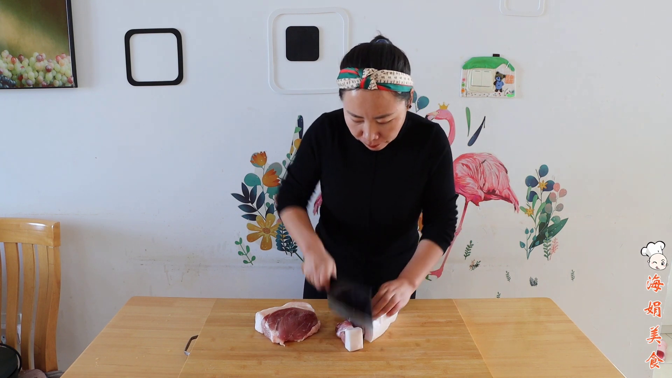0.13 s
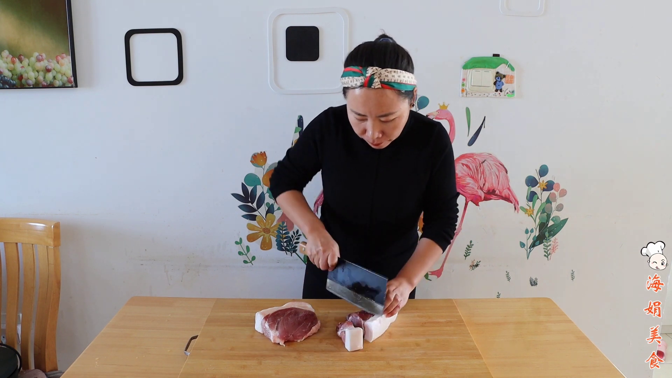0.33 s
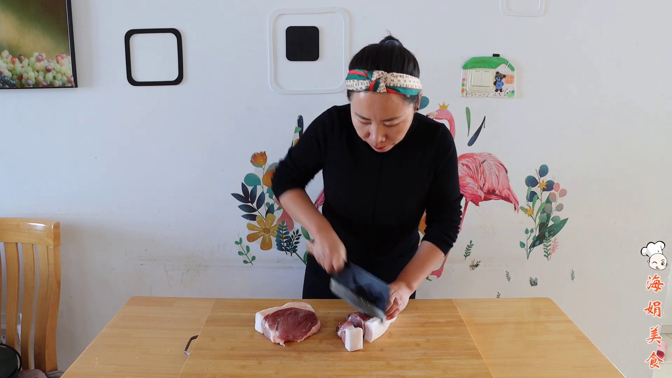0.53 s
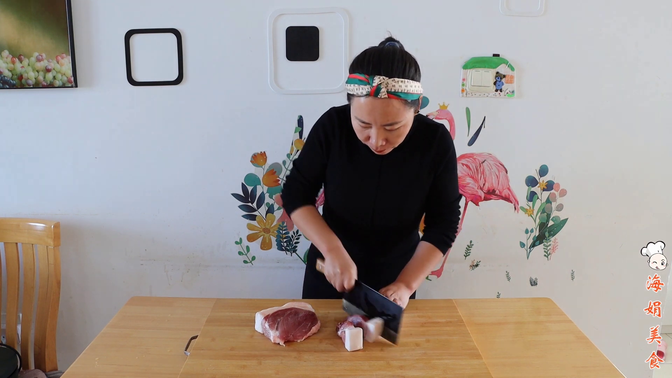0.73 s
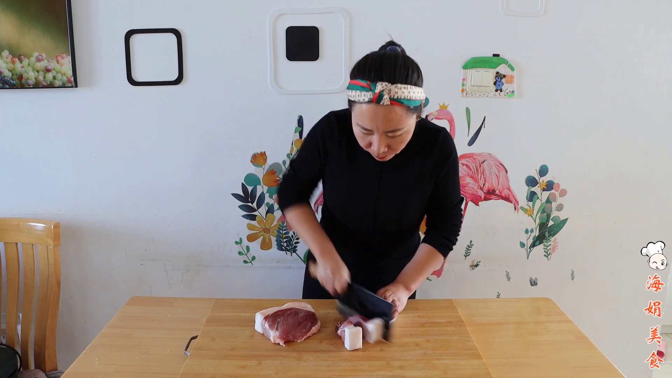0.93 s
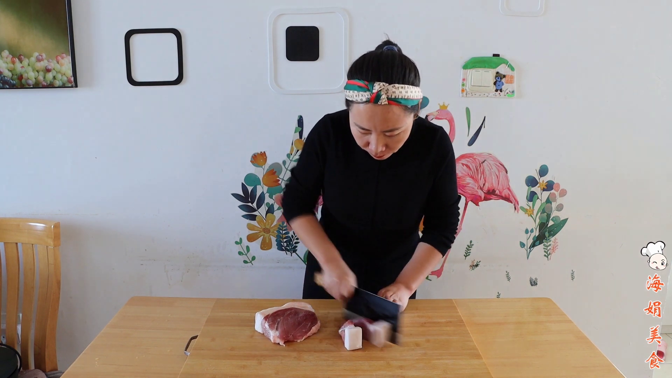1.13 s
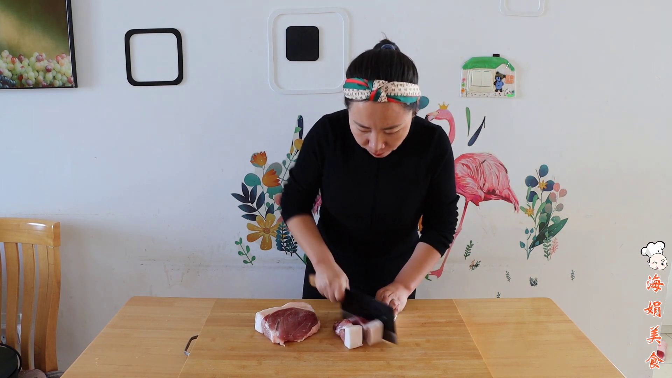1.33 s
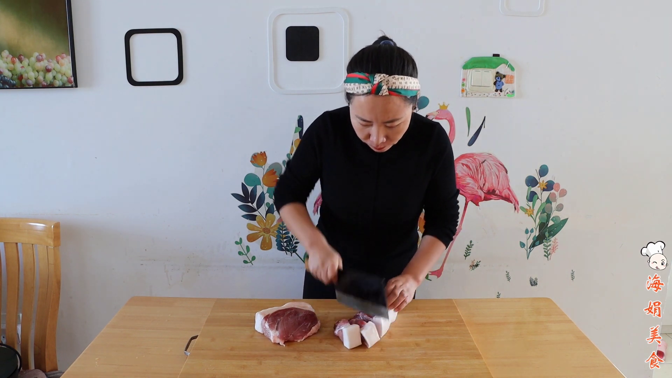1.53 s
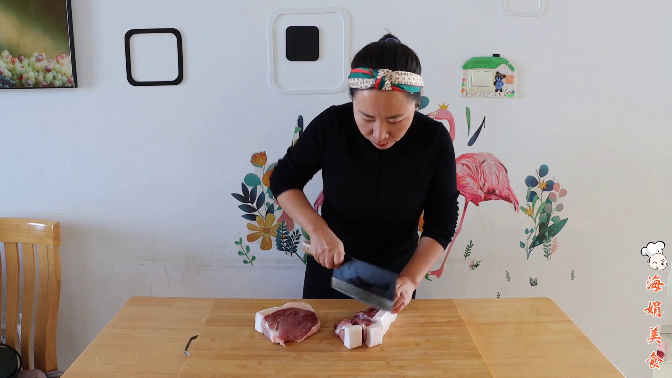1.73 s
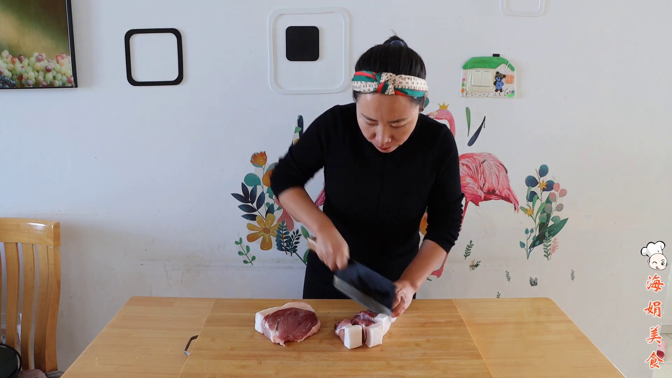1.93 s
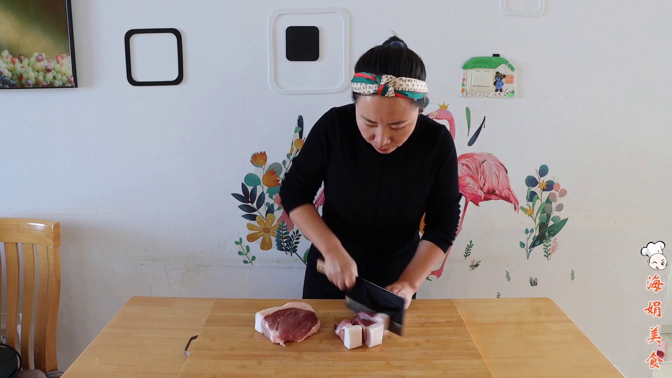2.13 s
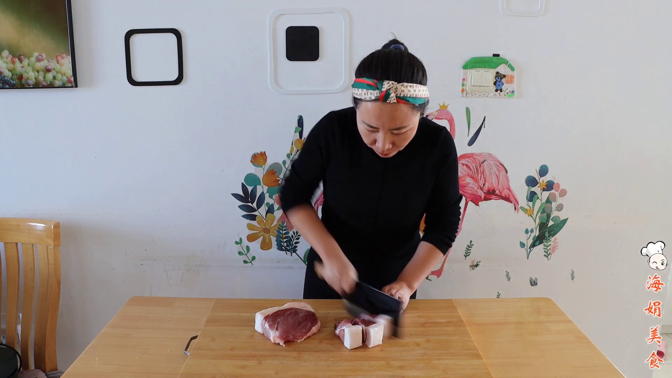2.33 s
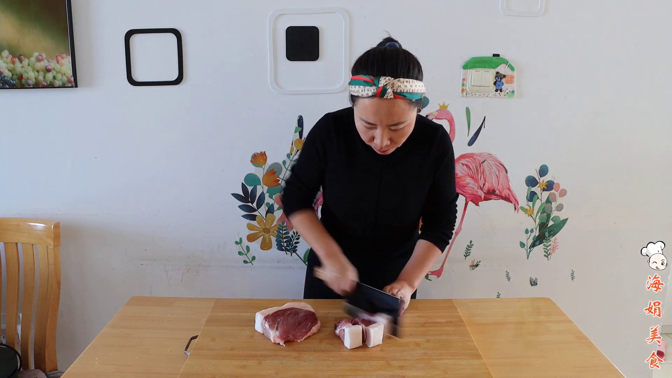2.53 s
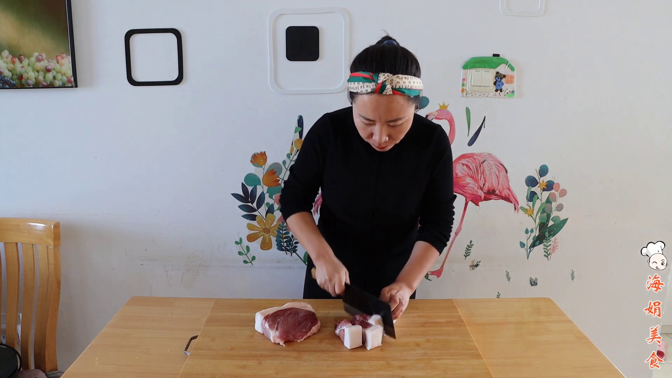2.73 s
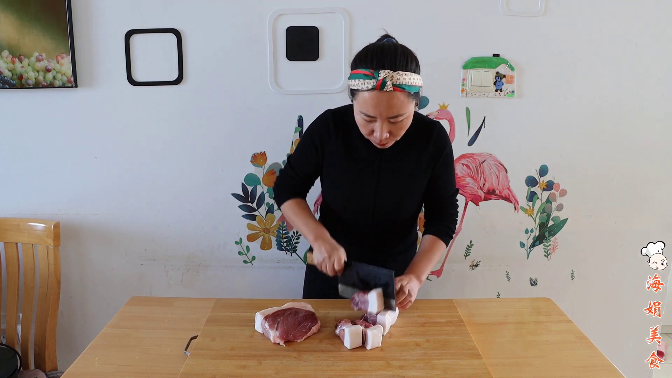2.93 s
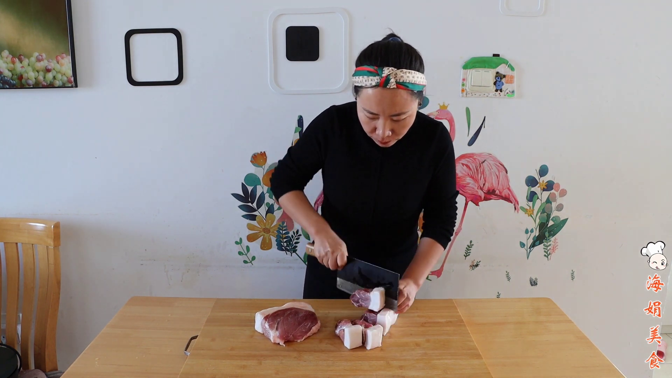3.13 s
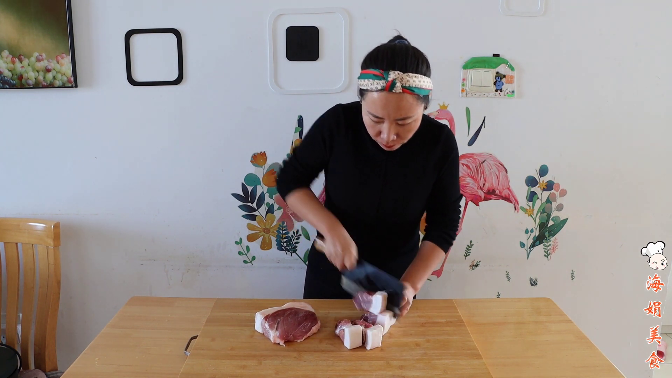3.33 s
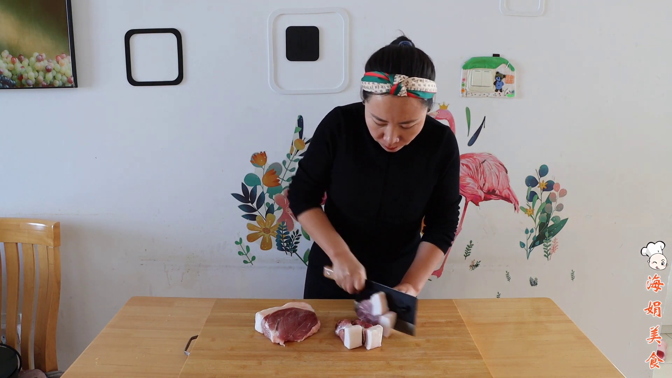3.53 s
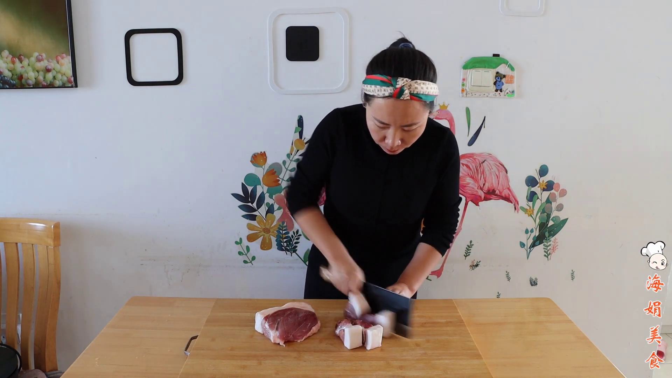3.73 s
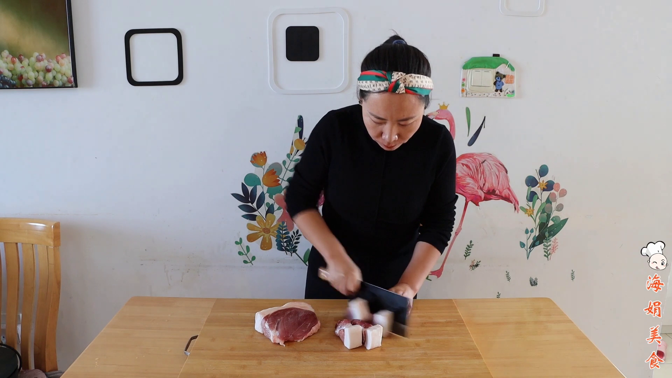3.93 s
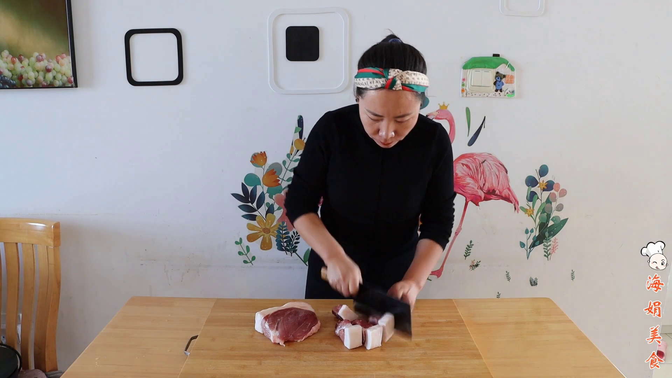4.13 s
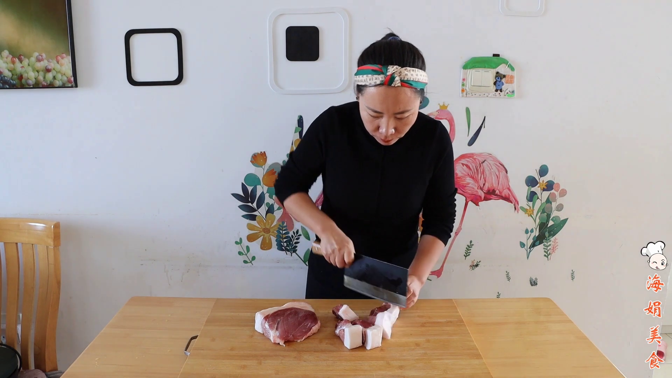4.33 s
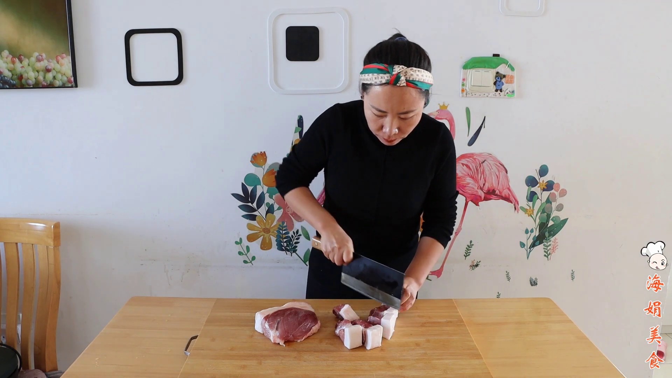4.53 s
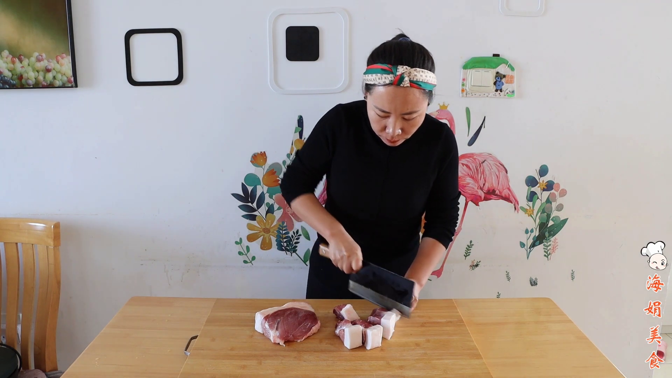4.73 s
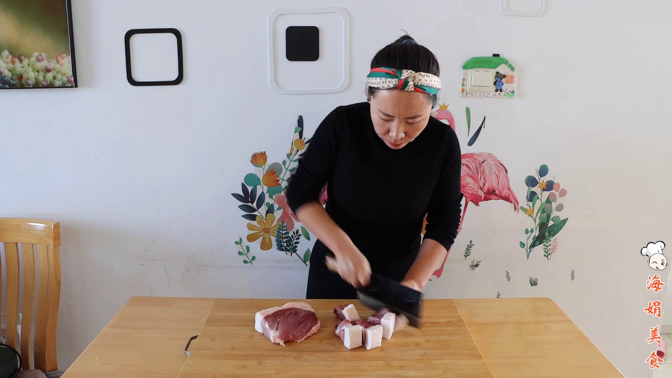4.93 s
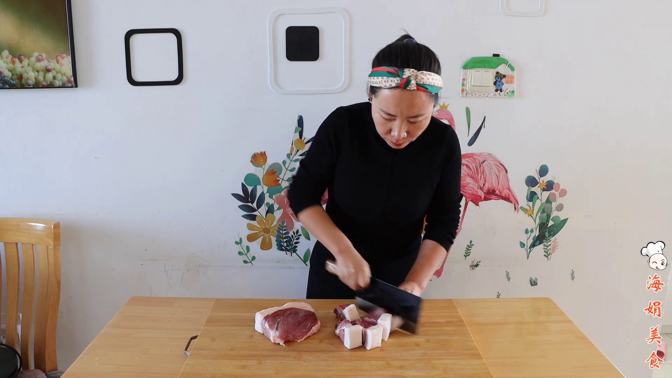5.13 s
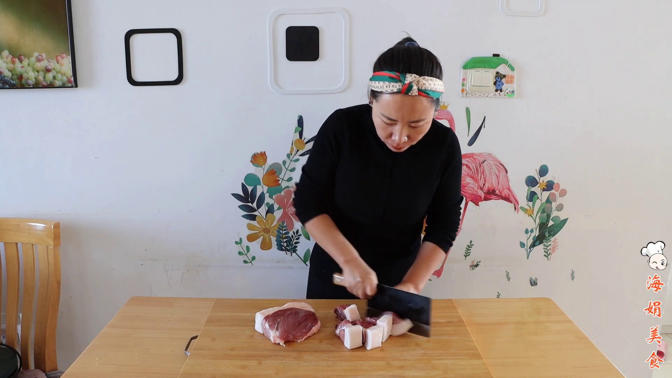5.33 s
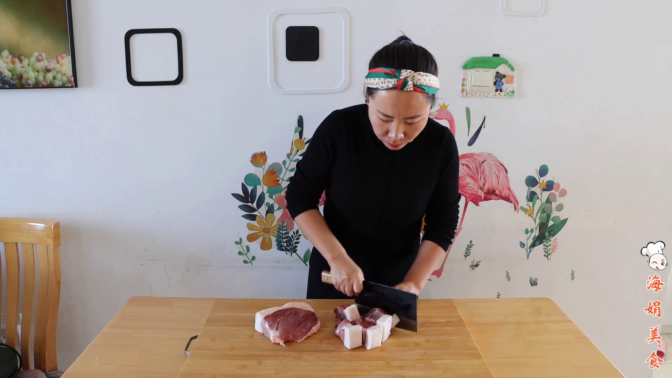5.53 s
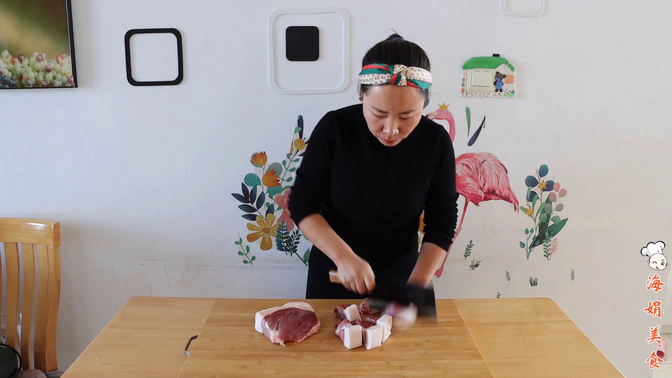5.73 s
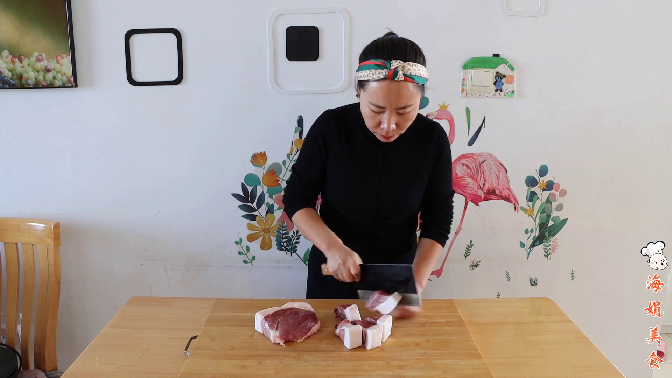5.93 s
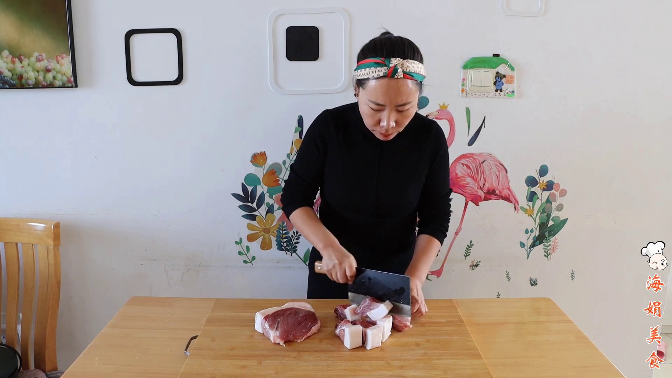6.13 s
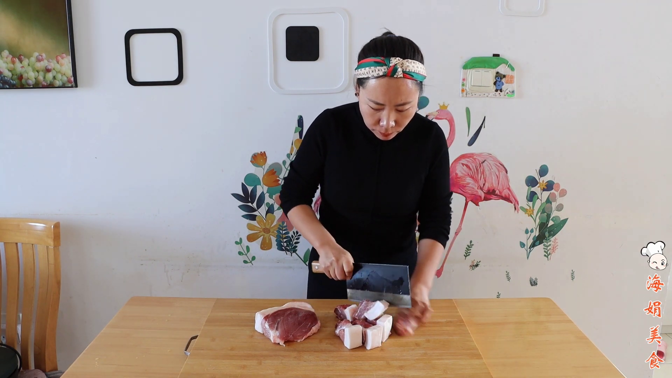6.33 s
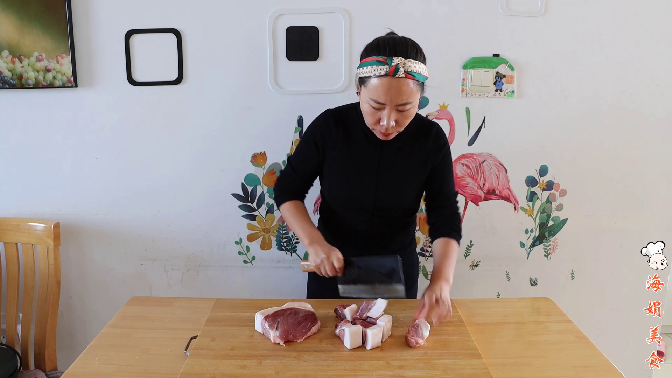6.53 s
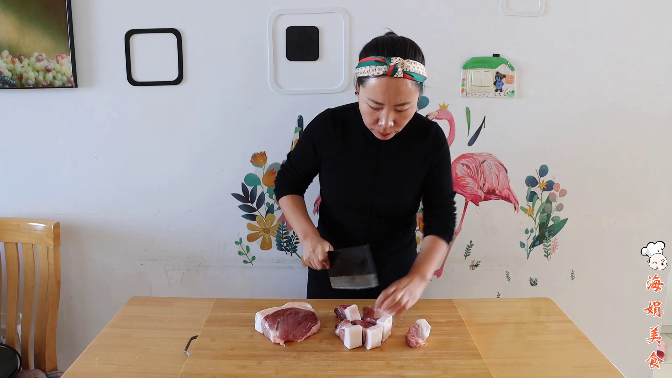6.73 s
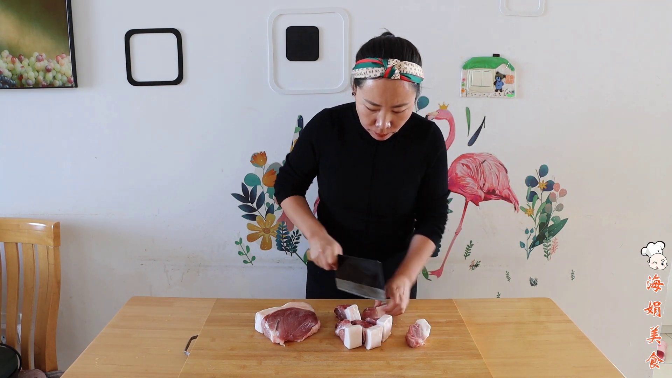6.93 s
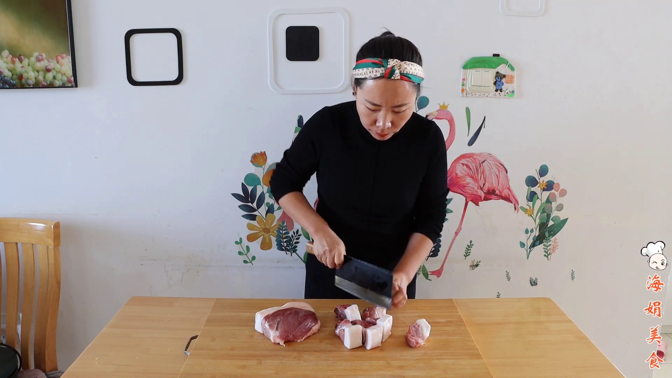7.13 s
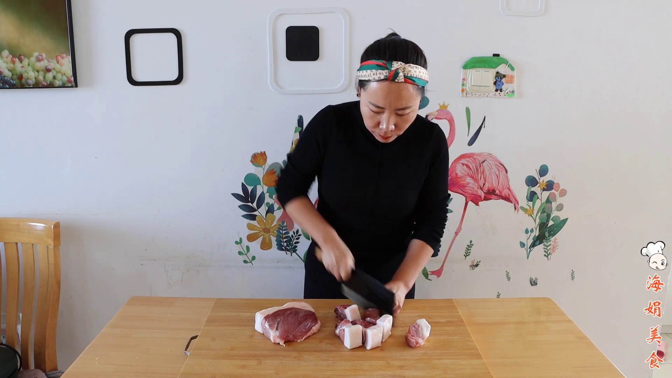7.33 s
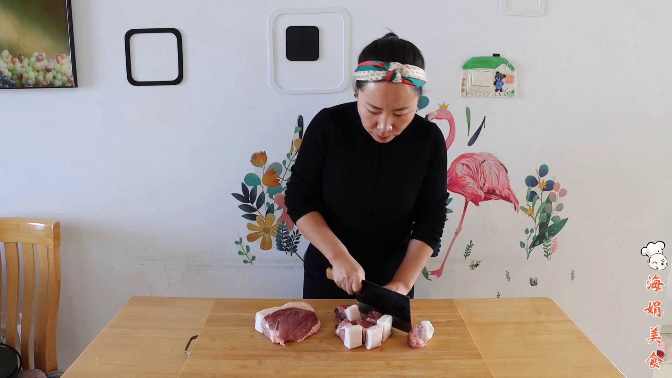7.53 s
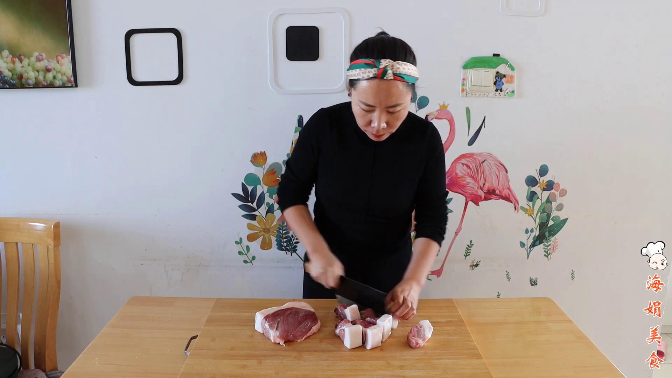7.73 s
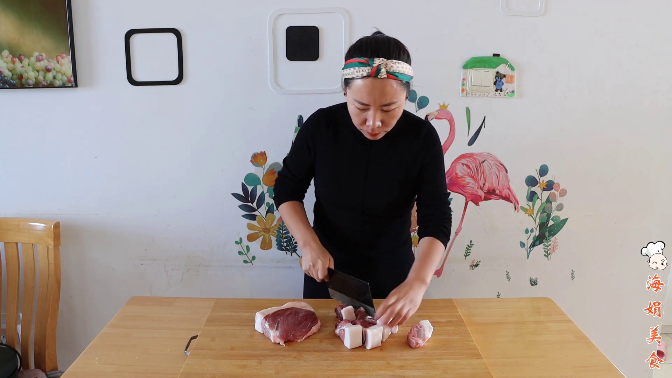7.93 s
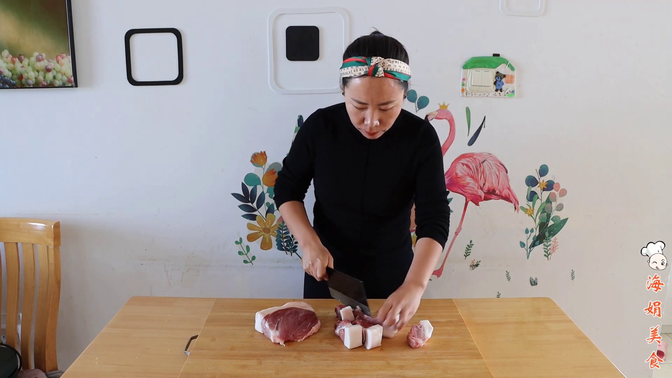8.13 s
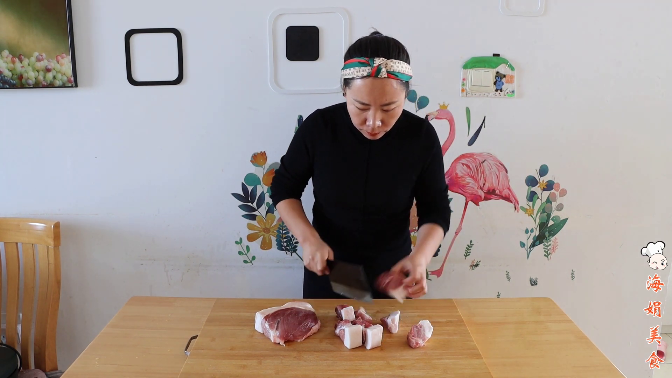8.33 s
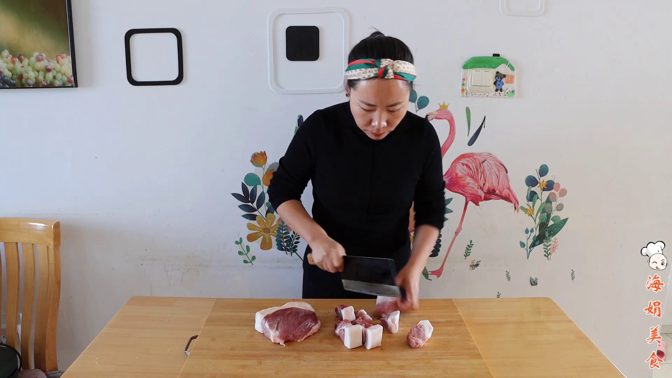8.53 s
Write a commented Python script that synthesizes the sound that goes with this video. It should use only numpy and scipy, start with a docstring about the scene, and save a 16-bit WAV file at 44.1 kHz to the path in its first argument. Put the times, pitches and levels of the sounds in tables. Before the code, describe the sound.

In a bare, echoing kitchen, a heavy cleaver saws through raw pork on a wooden table. Short strokes come in uneven bursts, rasping and hissing over a low rumble, with wet clicks, brief squeaks, light steel taps and soft bumps. Three knocks land as the blade breaks through; then fingers softly slide the meat, a last knock and few strokes follow, and a faint rub ends it. One microphone hears it over quiet room hiss.

```python
"""A cleaver saws through raw pork on a wooden table top in a bare, echoing kitchen.
From the start, strokes press (low rumble), rasp on wood and hiss: noise that follows the blade's speed.
Among them come wet clicks, squeaks, soft bumps, light taps of the blade, and four knocks as it breaks through.
Between the last two knocks fingers slide the meat about; after the last strokes comes a faint hollow rub.
Knocks, taps and clicks are short pulses given a room echo; a quiet room hiss lies under it all."""
import sys
import numpy as np
from scipy import signal
from scipy.fft import rfft, irfft, next_fast_len
from scipy.io import wavfile
from scipy.ndimage import map_coordinates

SR = 44100
rng = np.random.default_rng(int(sys.argv[2]) if len(sys.argv) > 2 else 0)


def to_wav(s):
    """Save 16-bit WAV."""
    ch = np.atleast_2d(s).T  # columns
    pcm = np.round(np.clip(ch, -1, 1) * 32767)  # PCM
    wavfile.write(sys.argv[1], SR, pcm.astype(np.int16))


N = 378593  # length in samples

# One row per push or pull of the blade; each layer's level is trimmed further when mixed:
# [start_s, length_s, press_db, rasp_db, bite_db (extra treble of the rasp), hiss_db]
STROKES = [(-0.075, .17, -44.5, -36.5, -3, -51.5), (0.042, 0.14, -48, -42.5, 4, -46),
           (0.629, 0.19, -47, -53, -2, -55), (0.76, .1, -46, -48.5, -1, -53.5),
           (1.054, 0.16, -45.5, -36, 0, -46), (1.244, .158, -45.5, -35.5, 1, -45),
           (1.392, 0.15, -50, -37.5, -1, -48.5), (2.059, 0.17, -42.5, -51.5, -5, -55),
           (2.134, 0.14, -43, -44.5, -2, -55), (2.445, 0.12, -40, -38.5, 0, -47),
           (2.627, .13, -43.5, -37, 1, -47.5), (2.806, 0.042, -44, -42.5, 1.5, -48),
           (3.394, 0.04, -50, -44, 1, -64), (3.43, .16, -43.5, -51, 1, -52.5),
           (3.531, 0.11, -41, -44.5, 1, -49), (3.675, .09, -64, -52, 1, -58),
           (3.812, 0.16, -41, -43.5, 0, -48.5), (4.027, 0.099, -44, -39.5, 5, -45),
           (4.153, 0.13, -46, -38.5, -3.5, -51), (4.298, .04, -65, -61, 0, -54),
           (4.735, 0.11, -53.5, -62.5, 9.5, -53), (4.992, 0.13, -44.5, -53, 7, -54.5),
           (5.076, 0.096, -42.5, -38.5, -0.5, -47.5), (5.368, .13, -40.5, -39, 1.5, -44.5),
           (5.578, 0.12, -44, -44.5, 5.5, -46.5), (5.708, 0.13, -46.5, -43.5, 1, -46),
           (7.447, 0.11, -45, -52.5, 2, -51), (7.722, 0.13, -48, -39.5, 0, -45),
           (7.84, 0.037, -43.5, -45.5, 4, -47.5)]
# Ring of the table and the room around it: [pitch_hz, level_db, t60_s (time to fade by 60 dB)]
TABLE_RING = [(63.5, -0.5, 0.98), (123.4, 8.5, 0.77), (144.8, 0.5, 0.97), (208.7, -1, 0.99),
              (246.3, 4.5, 0.66), (305.6, -8.5, 0.77), (340, -1.5, 0.2), (386.3, 1, 0.48), (500, 1.5, 0.72),
              (564.8, 4, 0.48), (799, 0.5, 0.74), (1060, -15, 0.31)]
# Ring of the steel blade: [pitch_hz, level_db, t60_s]
STEEL_RING = [(2250, -1, 0.16), (2670, -13, 0.17), (2960, 1, 0.37), (4770, 3, .2), (5615, 1.5, 0.33)]
# Resonances under the scraping edge: [pitch_hz, width_hz, level_db]
EDGE_RESONANCES = [(382, 69, -1.5), (556, 45, -1), (1196, 19, -6), (1750, 26, -21), (2510, 60, -12),
                   (2630, 86, -21), (3880, 86, -67)]
# Tone colours of the pressing rumble, the rasp on wood, the hiss of the edge and a parting fibre:
# [frequency_hz, relative_level_db (per Hz)]
RUMBLE_COLOUR = [(35, -35), (62, 0), (90, -12), (125, 0.5), (190, -3.5), (260, 1), (400, -8), (600, -10.5),
                 (1200, -39)]
RASP_COLOUR = [(200, -26), (380, -3.5), (600, -3), (900, -1), (1300, -5.5), (1700, -8), (3000, -12),
               (4500, -16.5), (7000, -35)]
HISS_COLOUR = [(2000, -8), (3800, -3), (5300, 1.5), (6400, -3), (8500, 1), (12000, -5), (15500, -14.5)]
SNAP_COLOUR = [(2000, -17), (4000, 1.5), (9000, -6), (12000, -5), (15500, -17)]
# How each layer follows a stroke: (power of the blade's speed, echo_db, echo_t60_s)
PRESS_LAW, RASP_LAW, HISS_LAW = (0.74, 3.1, 0.68), (0.99, 3.06, 0.5), (0.88, -6, 0.54)
BITE_HZ = 1400  # a biting edge lifts the rasp above this
# A fast edge sizzles: the top of the hiss is lifted above this level and dulled below it
SIZZLE_HZ, SIZZLE_AT_DB = 10500, -49


def slicing():
    """Pressing shakes the table; the sliding edge rasps on wood, hisses in meat and makes the steel ring."""
    starts, lengths, press_db, rasp_db, bite_db, hiss_db = np.transpose(STROKES)
    press = stroke_gain(starts, lengths, press_db, PRESS_LAW)
    rasp = stroke_gain(starts, lengths, rasp_db, RASP_LAW)
    bite = stroke_gain(starts, lengths, rasp_db + bite_db, RASP_LAW)
    hiss = stroke_gain(starts, lengths, hiss_db, HISS_LAW)

    shaken_table = filtered(grains(N, spread_db=3.5), lambda hz: 1 + amp(7.0) * ring(TABLE_RING, hz))
    rumble = coloured(shaken_table, RUMBLE_COLOUR)

    def body(hz):
        """The direct scrape plus what it sets ringing in blade and table."""
        return 1 + amp(2.5) * resonances(EDGE_RESONANCES, hz) + amp(6.5) * ring(TABLE_RING, hz)

    judder = wobble(70)  # stick and slip, shared by rasp and hiss
    scrape = coloured(filtered(grains(N, spread_db=1.5), body), RASP_COLOUR)
    scrape = roaming(scrape, depth_db=2.5) * amp(0.69 * judder)
    edge = coloured(grains(N, spread_db=1.5), HISS_COLOUR)
    edge = roaming(edge, depth_db=3.5) * amp(0.92 * judder)

    dull = filtered(scrape, lambda hz: 1 / (1 + (hz / BITE_HZ) ** 4))
    bright = scrape - dull
    rasping = amp(-0.83) * (rasp * dull + bite * bright)

    top = filtered(edge, lambda hz: 1 - 1 / (1 + (hz / SIZZLE_HZ) ** 6))
    sizzle = np.sqrt(hiss / amp(SIZZLE_AT_DB))
    hissing = amp(-1.1) * hiss * (edge + (sizzle - 1) * top)

    friction = rasping + hissing
    steel = filtered(friction, lambda hz: amp(3.0) * ring(STEEL_RING, hz))

    # single fibres part at random, about 90 a second, also while the edge barely moves
    snap_sizes = amp(4 * np.clip(rng.standard_normal(N), -2, 2))
    snaps = (rng.random(N) < 90 / SR) * snap_sizes
    crackle = amp(-36) * np.sqrt(hiss) * coloured(snaps, SNAP_COLOUR)
    return amp(0.2) * press * rumble + friction + steel + crackle


STROKE_LEAN = 1.12  # above 1 a stroke gathers speed slowly and stops quickly


def stroke_gain(starts, lengths, levels_db, law):
    """Speed follows a leaning half sine; the sound follows that speed and lingers in the room."""
    power, echo_db, t60 = law
    t = np.arange(N) / SR
    energy = np.zeros(N)
    for s, length, db in zip(starts, lengths, levels_db):
        moving = (t > s) & (t < s + length)
        speed = np.abs(np.sin(np.pi * ((t[moving] - s) / length) ** STROKE_LEAN))
        energy[moving] += (amp(db) * speed ** power) ** 2
    keep = amp(-60 / (t60 * SR)) ** 2  # share of echo energy left after one sample
    echo = signal.lfilter([1 - keep], [1, -keep], energy)
    return np.sqrt(energy + amp(echo_db) ** 2 * echo)


def roaming(x, depth_db):
    """The contact moves along the blade, so narrow bands swell and fade."""
    z = signal.stft(x, nperseg=1024)[2]
    patch = np.outer(np.hanning(9), np.hanning(9))
    field = signal.fftconvolve(rng.standard_normal(z.shape), patch, "same")
    moved = signal.istft(z * amp(depth_db * unit(field)), nperseg=1024)[1]
    return unit(moved[:len(x)])


# The blade breaks through onto the wood; the squelch is trimmed further when mixed:
# [time_s, thud_db, contact_ms, boom_db (of the table's middle), crack_db, crack_cutoff_hz, squelch_db]
KNOCKS = [(2.496, -21, 0.53, 5, -11.5, 4330, -37.5), (3.9066, -28, 0.58, 4.5, -21, 2600, -40.5),
          (5.3060, -25, 0.61, 1.5, -20.5, 1830, -46.5), (7.5235, -17, 0.45, -4.5, -31, 2400, -38)]
# Tone colour of steel cracking on wood: [frequency_hz, relative_level_db (per Hz)]
CRACK_COLOUR = [(200, -39), (600, 5.5), (1300, 7), (3000, 4), (5000, -8), (15000, -5)]
LEAD_S = 0.01  # room left before the middle of a thud or crack


def knocks():
    """The blade breaks through: a crack of steel on wood, a thud of the table top and a squelch."""
    out = np.zeros(N)
    t = np.arange(SR // 4) / SR
    pulse = coloured(signal.unit_impulse(len(t), round(LEAD_S * SR)), CRACK_COLOUR)
    for s, thud_db, contact_ms, boom_db, crack_db, crack_hz, squelch_db in KNOCKS:
        add(out, s - LEAD_S, thud(thud_db, contact_ms, boom_db))
        # meat under the edge dulls the crack
        dulled = filtered(pulse, lambda hz: 1 / np.sqrt(1 + (hz / crack_hz) ** 6))
        crack = dulled + amp(-28) * pulse
        touch = s - LEAD_S - contact_ms / 1000
        add(out, touch, in_room(amp(crack_db) * crack / crack.max(), wet_db=-4.5, wall_db=-15))
        squeeze = (1 - np.exp(-t / 0.00065)) * np.exp(-t / 0.078)  # quick rise, slower fade
        wet_hiss = coloured(grains(len(t), spread_db=1.5), HISS_COLOUR)
        wet_rasp = coloured(grains(len(t), spread_db=0.5), RASP_COLOUR)
        add(out, s, amp(squelch_db - 4) * squeeze * (wet_hiss + amp(10) * wet_rasp))
    return out


# The table top's main bending, stronger the nearer its middle is struck
BOOM_HZ, BOOM_WIDTH_HZ = 122, 22


def thud(db, contact_ms, boom_db=0):
    """One push of the table top, with its ring and its echo; a longer contact sounds deeper."""
    u = (np.arange(SR // 4) / SR - LEAD_S) * 1000 / contact_ms  # time in contact lengths
    push = -amp(db) * u * np.exp((1 - u * u) / 2)
    sound = in_room(push, wet_db=4.0, wall_db=3)
    table = filtered(np.pad(push, (0, SR)), lambda hz: amp(17) * ring(TABLE_RING, hz))
    add(sound, 0, table)
    boom = [(BOOM_HZ, BOOM_WIDTH_HZ, 0)]
    return filtered(sound, lambda hz: 1 + (amp(boom_db) - 1) * resonances(boom, hz))


# Soft bumps on the table, cushioned by the meat: [time_s, thud_db, contact_ms]
BUMPS = [(.806, -40.5, 0.74), (1.099, -36.5, 0.92), (1.806, -49.5, 0.87), (2.104, -41, 1.6),
         (3.635, -46, 1.8), (4.4799, -42.5, 1.3), (4.52, -40.5, 2), (6.861, -52, 2.2), (6.955, -47.5, 3),
         (7.325, -51, 2.7), (7.458, -44, 0.48), (7.862, -40.5, 1.6)]


def bumps():
    """Hand and blade push the meat against the table: a thud alone."""
    out = np.zeros(N)
    for s, db, contact_ms in BUMPS:
        add(out, s - LEAD_S, thud(db, contact_ms))
    return out


# Light taps of the blade: [time_s, steel_tick_db, short_note_db, pitch_hz (of the note), echo_db]
TAPS = [(0.9571, -26.5, -40, 960, 5), (2.833, -25, -56, 950, 0), (3.016, -24.5, -30.5, 1010, 5),
        (3.409, -29, -38, 950, 7), (6.998, -47, -29, 2160, -1.5)]
# Tone colour of a light tap: [frequency_hz, relative_level_db (per Hz)]
TICK_COLOUR = [(300, -11), (1000, -7), (2000, -2), (3000, -4), (4200, -8), (7000, -18), (15000, -26.5)]


def taps():
    """Light touches of the blade: a steel tick and a short note (hollow on wood, higher on steel) that echo."""
    out = np.zeros(N)
    lead = 1 / 200  # s, room before the tick's middle
    tick = coloured(signal.unit_impulse(SR // 20, round(lead * SR)), TICK_COLOUR)
    for s, tick_db, note_db, hz, echo_db in TAPS:
        touch = amp(tick_db) * tick / tick.max()
        add(touch, lead, amp(note_db) * ping(hz, cycles=0.38))
        add(out, s - lead, in_room(touch, wet_db=echo_db, wall_db=-6.5))
    return out


# Wet clicks and snapping fibres, each starting 1.21 ms after its listed time: [time_s, peak_db, pitch_hz]
CLICKS = [(0.0993, -12, 2970), (0.777, -28, 9210), (1.077, -25, 7060), (1.6367, -36, 3350),
          (2.507, -15.5, 2980), (2.5284, -22, 9000), (2.8674, -35, 4500), (2.9125, -27, 10000),
          (3.702, -32.5, 3020), (3.867, -29, 5100), (4.2135, -30, 2600), (4.311, -31, 11000),
          (4.3374, -27.5, 4500), (4.904, -38, 4800), (5.403, -33, 10000), (7.4655, -28.5, 9200)]


def clicks():
    """Sticky fat lets go in sharp clicks, each a tiny pocket ringing for a cycle or two."""
    out = np.zeros(N)
    for s, db, hz in CLICKS:
        click = amp(db) * ping(hz, cycles=1.13)
        add(out, s + 0.00121, in_room(click, wet_db=-8.5, wall_db=-24))
    return out


def ping(hz, cycles):
    """A damped sine of peak near 1 that fades within a few cycles."""
    phase = hz * np.arange(SR // 20) / SR  # in cycles
    return np.sin(2 * np.pi * phase) * np.exp(-(phase - 1 / 4) / cycles)


# The edge sticks and squeaks; length_s is the spread either side of the middle:
# [middle_s, level_db, length_s, slip_rate_hz, roughness (0-1)]
CATCHES = [(1.119, -42.5, .006, 1340, 0.37), (4.254, -37, 0.0033, 1430, 0.06),
           (5.41, -58, 0.0039, 1390, 0.4), (7.857, -42, 0.013, 1410, .16)]


def squeaks():
    """The edge catches: a short train of slips that leaves the steel ringing."""
    out = np.zeros(N)
    t = np.arange(SR // 2) / SR
    lead = 1 / 20  # s, room before the burst's middle
    for s, db, length, hz, rough in CATCHES:
        gaps = np.abs(1 + rough * rng.standard_normal(len(t) // 8))
        slip_times = np.cumsum(gaps) / hz
        slips = np.histogram(slip_times, len(t), (0, len(t) / SR))[0].astype(float)
        swell = np.exp(-((t - lead) / length) ** 2 / 2)
        burst = amp(db) * coloured(slips, HISS_COLOUR) * swell
        ringing = filtered(burst, lambda f: 1 + amp(5) * ring(STEEL_RING, f))
        add(out, s - lead, in_room(ringing, wet_db=-9, wall_db=-26))
    return out


# Fingers shifting the meat: [start_s, length_s, level_db]
HANDLING = [(5.975, .1, -61.5), (6.07, .13, -55), (6.42, 0.15, -58)]
# A faint hollow rub as the last piece is moved: [start_s, length_s, level_db]
RUBS = [(8.367, 0.09, -60.5)]
# How the sound follows the hand: [power of the hand's speed, echo_db, echo_t60_s]
HANDLING_LAW = (.7, -2, 0.56)
RUB_HZ, RUB_WIDTH_HZ = 866, 68


def handling():
    """Fingers slide the soft pieces about; one rubs with a hollow note."""
    soft_colour = [(500, -3.0), (1600, 1), (4000, -7), (12000, -18.0)]  # (frequency_hz, level_db)
    slide = coloured(grains(N, spread_db=3.5), soft_colour)
    hollow = [(RUB_HZ, RUB_WIDTH_HZ, 0)]
    rub = unit(filtered(grains(N, spread_db=6), lambda hz: resonances(hollow, hz)))
    sliding = stroke_gain(*np.transpose(HANDLING), HANDLING_LAW) * slide
    rubbing = stroke_gain(*np.transpose(RUBS), HANDLING_LAW) * rub
    return sliding + rubbing


# Tone colour of the quiet room: [frequency_hz, relative_level_db (per Hz)]
FLOOR_COLOUR = [(12, -29), (20, -2.5), (133, -2.5), (167, -9.5), (240, -7), (276, -9), (456, -12.5),
                (539, -12.5), (603, -12.5), (843, -17), (1020, -16.5), (1470, -20), (3040, -23.5),
                (3310, -25), (15800, -31)]
FLOOR_DB = -54


def room_tone():
    """Steady hiss and low rumble of the quiet kitchen."""
    return amp(FLOOR_DB) * coloured(rng.standard_normal(N), FLOOR_COLOUR)


# How long the kitchen echoes: [frequency_hz, t60_s]
KITCHEN_ECHO = [(100, 0.32), (300, 0.55), (800, 0.54), (2000, 0.48), (5000, 0.33), (14000, 0.079)]
WALL_S = 0.0067  # delay of the echo from the nearest wall


def in_room(x, wet_db, wall_db):
    """A short sound, its echo from the nearest wall and a fresh diffuse tail."""
    hz, t, z = signal.stft(rng.standard_normal(SR), SR, nperseg=256)
    fade = amp(-60 * t / along(KITCHEN_ECHO, hz)[:, None])
    tail = signal.istft(z * fade, SR, nperseg=256)[1]
    tail *= 1 - np.exp(-(np.arange(len(tail)) / SR / 0.00022) ** 2)  # soft onset
    paths = amp(wet_db) * tail / np.linalg.norm(tail)
    paths[0] += 1  # the direct sound
    paths[round(WALL_S * SR)] += amp(wall_db)
    return signal.fftconvolve(x, paths)


def ring(modes, hz):
    """Response of (Hz, dB, t60) modes; a mode's width follows from its decay time."""
    return resonances([(f, np.log(1000) / np.pi / t60, db) for f, db, t60 in modes], hz)


def resonances(modes, hz):
    """Summed response of (Hz, width, dB) resonators."""
    return sum(amp(db) * 1j * hz * w / (c * c - hz * hz + 1j * hz * w) for c, w, db in modes)


def grains(count, spread_db):
    """Dense tiny slips of widely varying size."""
    sizes_db = spread_db * np.repeat(rng.standard_normal(count // 32 + 1), 32)[:count]
    return unit(rng.standard_normal(count) * amp(sizes_db))


def wobble(rate):
    """A smooth random curve with rate knots a second."""
    knots = rng.standard_normal(int(N * rate / SR) + 4)
    return map_coordinates(knots, [np.arange(N) * rate / SR])


def coloured(x, spectrum):
    """x shaped by a spectrum, at rms 1."""
    return unit(filtered(x, lambda hz: amp(along(spectrum, hz))))


def filtered(x, response):
    """x times a complex response of frequency."""
    size = next_fast_len(len(x) + SR // 2)
    return irfft(rfft(x, size) * response(np.fft.rfftfreq(size, 1 / SR)), size)[:len(x)]


def along(points, hz):
    """Read (Hz, value) points on a log axis."""
    f, v = np.transpose(points)
    return np.interp(np.log(hz + 1), np.log(f + 1), v)


def amp(db):
    """Decibels to gain."""
    return 10 ** (np.asarray(db) / 20)


def unit(x):
    """Scale to rms 1."""
    return x / np.sqrt(np.mean(x ** 2) + 1e-20)


def add(track, s, sound):
    """Mix a sound into the track at time s."""
    start = max(round(s * SR), 0)
    part = track[start:start + len(sound)]
    part += sound[:len(part)]


def scene():
    """All sources at one microphone."""
    blade = slicing() + knocks() + bumps() + taps()
    details = clicks() + squeaks() + handling()
    return (blade + details + room_tone())[None]


TOP_HZ = 15850  # band limit of the recorder


def record(dry):
    """The recorder keeps nothing above its band limit."""
    return np.array([filtered(channel, lambda hz: hz < TOP_HZ) for channel in dry])


dry = scene()
out = record(dry)
to_wav(out)
```